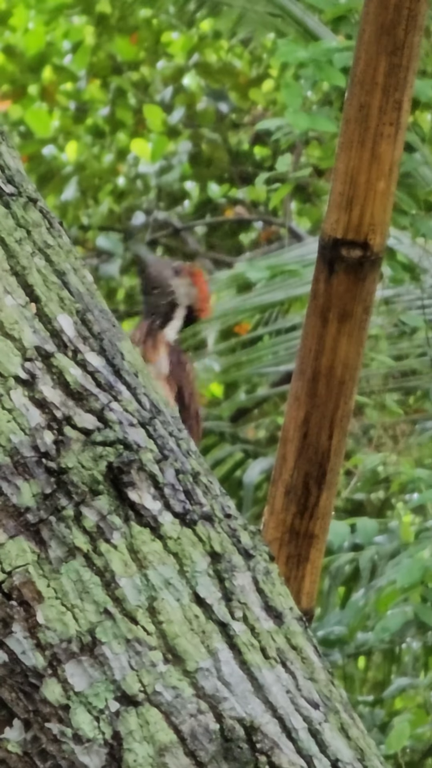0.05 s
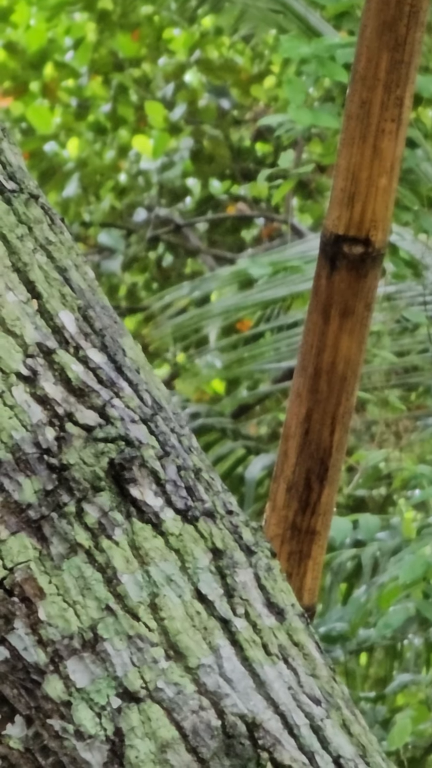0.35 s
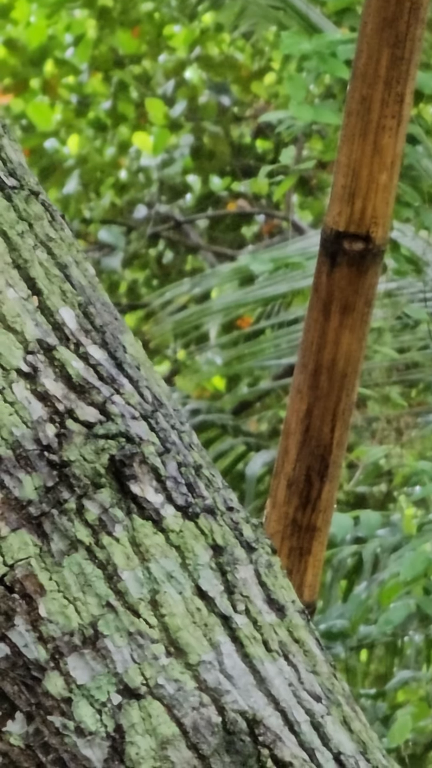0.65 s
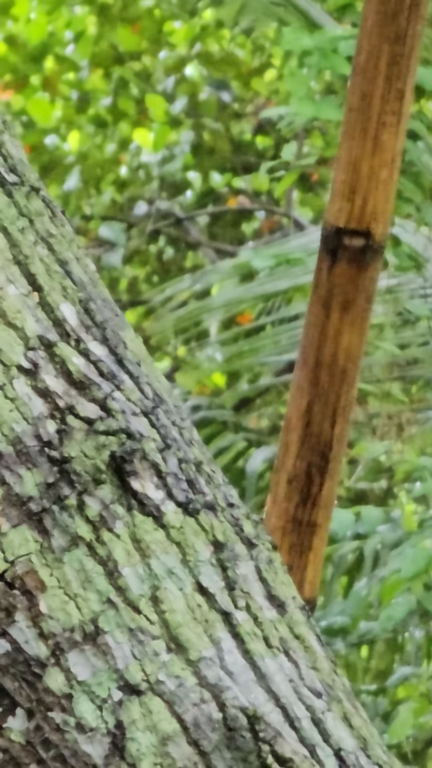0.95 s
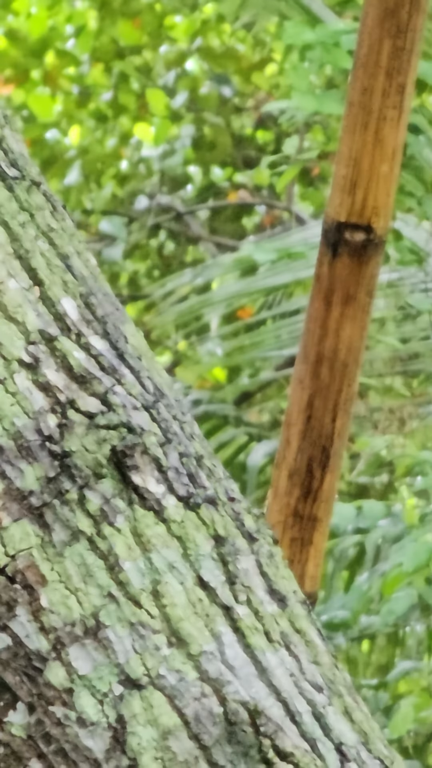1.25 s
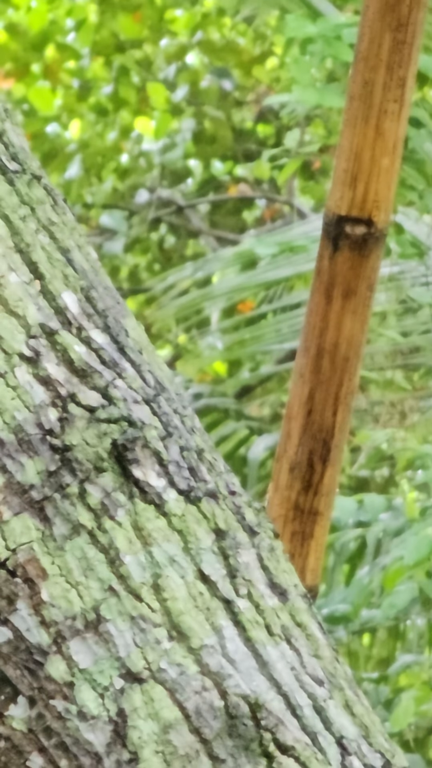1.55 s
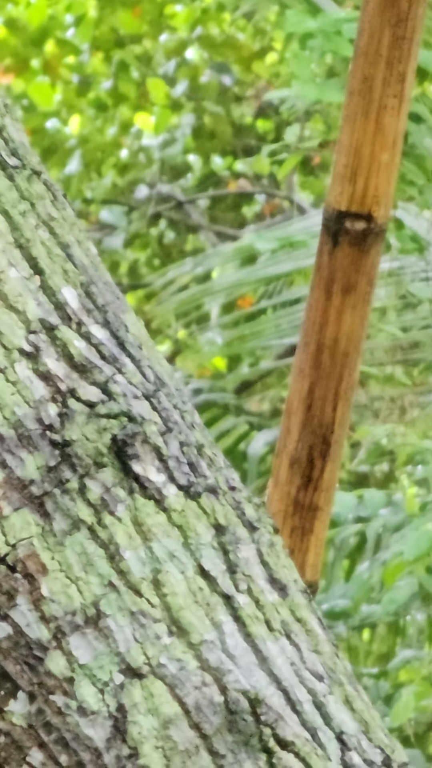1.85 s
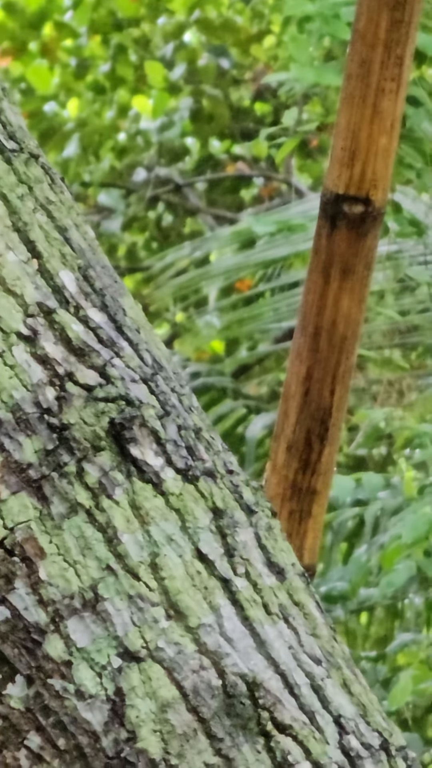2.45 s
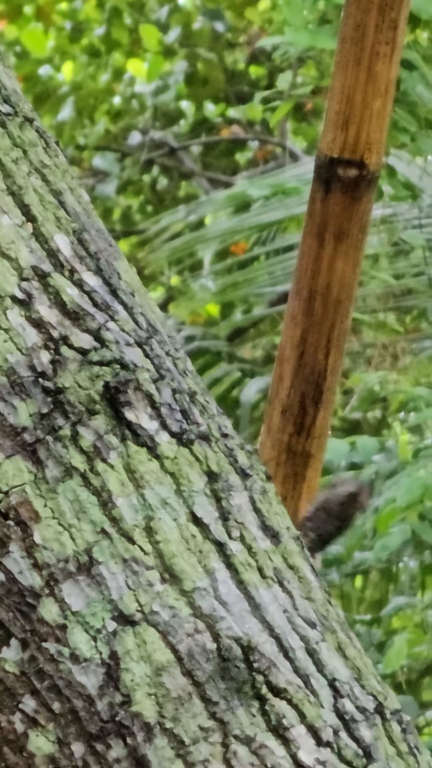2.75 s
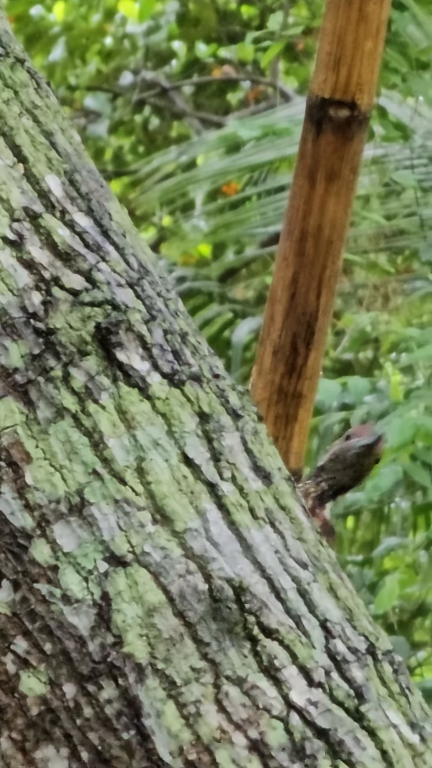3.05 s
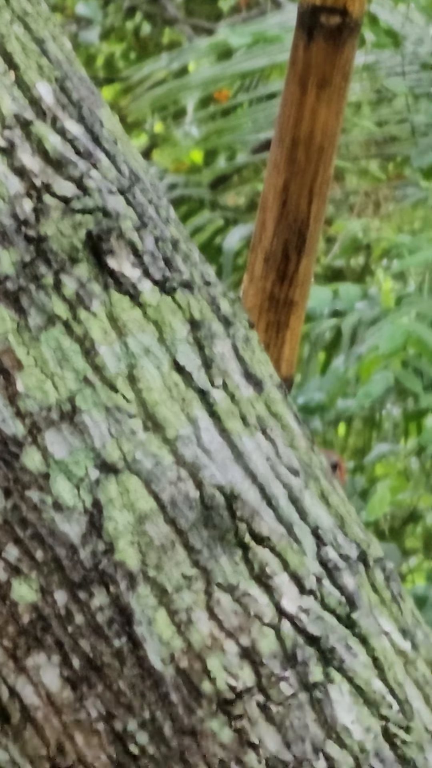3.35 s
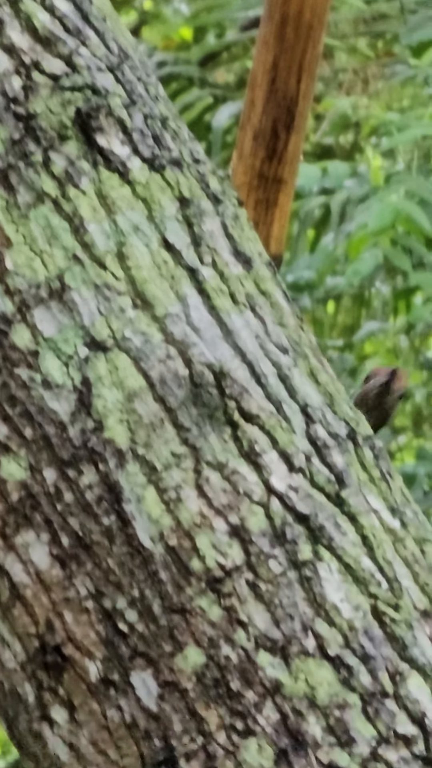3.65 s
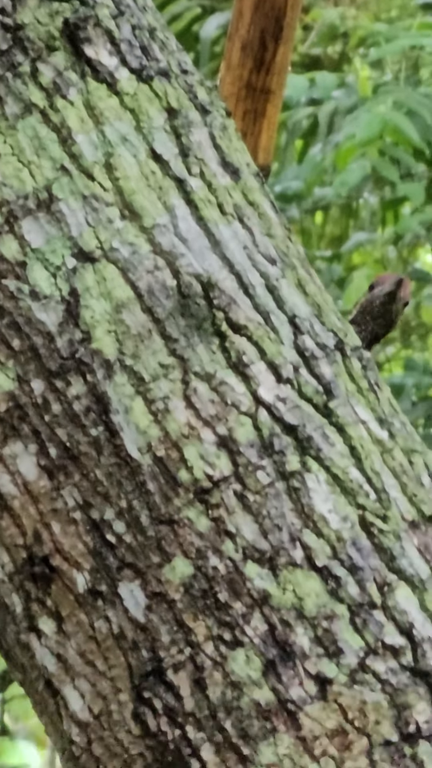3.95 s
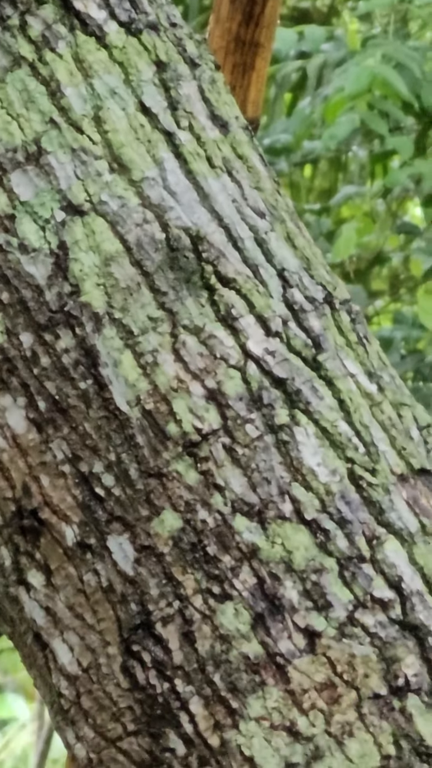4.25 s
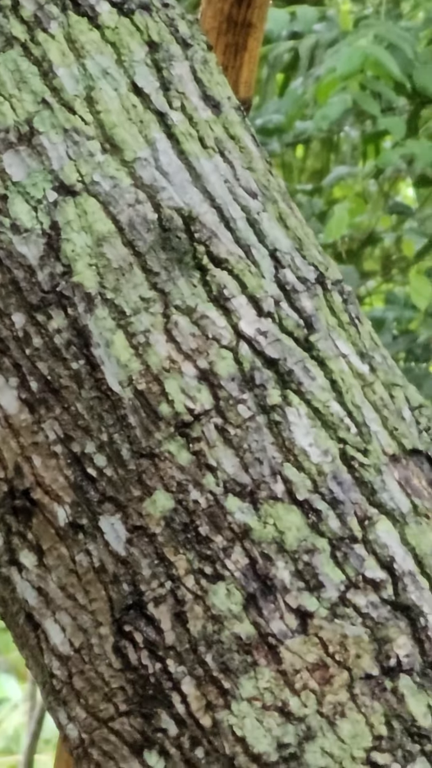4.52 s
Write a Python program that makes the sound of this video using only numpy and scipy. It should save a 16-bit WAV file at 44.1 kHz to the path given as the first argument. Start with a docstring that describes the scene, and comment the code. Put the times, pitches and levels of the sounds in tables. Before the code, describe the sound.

From the start, a close bird slightly to the right repeats a sharp whistle that dips and then sweeps quickly upward. About ten come evenly, roughly three a second, until 3.5 seconds, each with a short outdoor echo. Softer ones follow at about 5.2, 5.5 and 7.2 seconds. At about 7.4 seconds a harsh, rasping screech begins and swells until the end. A steady high insect drone continues throughout, over a faint breeze and a low distant rumble. A small far bird gives five faint runs of six high chirps, about every second and a half. Other distant birds whistle, caw and coo quietly, with caws near 1 to 1.8 seconds and again after 6.5. A few soft puffs of air pass, mostly between 5 and 6 seconds, and twigs tick lightly near 3.7 and 7.4 seconds.

```python
"""A close bird repeats a dipping, upswept whistle among tree trunks, then starts a harsh screech.
The whistle is a frequency-modulated pure tone that interferes with its own echoes; the screech is a
pulsed, noisy source shaped by throat and beak resonances. A small caller chirps in runs, and far birds
whistle, caw and coo, scattered by foliage. Soft puffs of air, one brief far call and ticking twigs are
bursts of noise; behind them lie an insect drone, faint open air and a low rumble."""
import sys
import numpy as np
from scipy import signal
from scipy.fft import rfft, irfft, next_fast_len
from scipy.io import wavfile
from scipy.ndimage import uniform_filter1d, minimum_filter1d, map_coordinates

SR = 44100
rng = np.random.default_rng(int(sys.argv[2]) if len(sys.argv) > 2 else 0)


def waveform_to_disk(signal):
    """Save audio, clipped to [-1, 1], as 16-bit WAV at the path in sys.argv[1]."""
    frames = np.transpose(np.atleast_2d(signal))
    scaled = np.clip(frames, -1, 1) * 32767
    samples = np.round(scaled).astype(np.int16)
    wavfile.write(sys.argv[1], SR, samples)


N = 336042


def whistles(dip_hz=1906.4, full_voice_hz=3146, dip_db=-22, sag_db_per_s=54, release_db_per_s=1301,
             attack_s=0.0053, release_s=0.0036, direct_db=-3.5, wet_db=-7.5, hiss_db=-45):
    """Frequency modulation: one pure tone flicks, dips, then sweeps up, louder as it climbs."""
    # whistles: start t/s, time to the top t/s, top f/Hz, level/dB, extra level at the top/dB
    notes = [(-.22, .194, 4780, -20, -1.5), (.118, 0.15, 4630, -13.5, -15), (.473, 0.14, 4533, -12.5, -1),
             (.814, 0.14, 4564, -11, -1), (1.125, 0.15, 4636, -9.5, -1.5), (1.473, 0.15, 4780, -11, -1.5),
             (1.818, 0.14, 4740, -10, 0.5), (2.163, 0.15, 4710, -10.5, 1), (2.52, .146, 4830, -10.5, 0),
             (2.887, 0.15, 4685, -11, 1.5), (3.296, 0.14, 4655, -13, -1.5), (5.162, 0.15, 4445, -16, -6.5),
             (5.517, 0.16, 4640, -17.5, -6.5), (7.168, 0.15, 4470, -20, -2.5)]
    out, t = np.zeros((2, N)), np.arange(SR // 4) / SR
    flick = np.exp(-((t - 0.0084) / 0.01099) ** 2)
    for s, length, top_hz, db, top_db in notes:
        climb = np.clip((t / length - .45) / .55, 0, 1)  # the last 55 % of the note
        rise = .85 * climb ** 1.22 + .15 * climb ** 7.8  # gathers speed, ends in a quick snap
        octaves = 0.29 * flick + np.log2(top_hz / dip_hz) * rise
        hz = dip_hz * 2 ** octaves
        height = np.clip(2 * hz / top_hz - 1, 0, 1)  # effort changes only the top of the sweep
        softness = np.clip(1 - octaves / np.log2(full_voice_hz / dip_hz), 0, 1) ** 1.39
        soft_db = (dip_db - sag_db_per_s * t) * softness  # the low note fades while held
        release_db = release_db_per_s * np.maximum(t - length + release_s, 0)
        swell = amp(db + soft_db - 6 * flick + top_db * height - release_db)
        swell *= np.minimum(t / attack_s, 1)
        tone = swell * sine(hz)
        hiss = amp(hiss_db) * swell * height * rng.standard_normal(len(t))
        add(out, s, sides(lean_db=-7) * amp(direct_db) * trunks(tone))
        add(out, s, sides(lean_db=-6) * foliage(amp(wet_db) * tone + hiss))
    return out


def screech(pitch_hz=430, rise_per_s=1.1, noise_share=0.89, beak_db=7, beak_width_hz=450):
    """Source and filter: a rising, rasping buzz excites a resonance that climbs as the beak opens."""
    # course of the screech: t/s, level/dB, beak resonance f/Hz
    course = [(7.44, -55, 2000), (7.455, -38.5, 1890), (7.5, -31.5, 2130), (7.53, -31.5, 3000),
              (7.6, -26.5, 3260), (7.62, -22.5, 3280)]
    # throat response: f/Hz, level/dB
    throat = [(150, -55), (320, -13), (418, -31), (479, -10), (599, -30), (935, -7), (1070, -15),
              (3160, -1), (4370, -8), (6480, -16), (8970, -28.5), (11400, -27.5), (15000, -41)]
    t = clock()
    s, db, beak_hz = np.transpose(course)
    cycles = np.cumsum(pitch_hz * (1 + rise_per_s * np.maximum(t - s[0], 0) + 0.015 * wobble(300))) / SR
    pulses = np.diff(np.floor(cycles), prepend=0)
    rasp = rng.standard_normal((2, N)) * (1 + 0.34 * np.cos(2 * np.pi * cycles))
    source = np.sqrt(1 - noise_share) * unit(pulses - pulses.mean()) + np.sqrt(noise_share) * unit(rasp)
    hz, frames, spectra = signal.stft(source, SR, nperseg=512)
    beak = beak_db * np.exp(-((hz[:, None] - np.interp(frames, s, beak_hz)) / beak_width_hz) ** 2)
    voice = signal.istft(spectra * amp(along(throat, hz)[:, None] + beak), SR, nperseg=512)[1][:, :N]
    return sides(lean_db=-5.5) * amp(np.interp(t, s, db, left=-120)) * unit(voice)


def chirper(pitch_hz=3990, arch_hz=270, rasp_hz=110, length_s=0.064, direct_db=-7.5, wet_db=1.5):
    """Random frequency modulation roughens a far caller's arched notes, six to a run."""
    # chirp runs: first chirp t/s, last chirp t/s, level/dB
    runs = [(0.519, 1.077, -51), (1.939, 2.501, -48.5), (3.385, 3.942, -50.5), (4.792, 5.33, -50),
            (6.163, 6.696, -49.5)]
    out, rasp = np.zeros((1, N)), wobble(500)
    u = np.linspace(-1, 1, round(length_s * SR))
    for first, last, db in runs:
        for s in np.linspace(first, last, 6):
            jitter = rasp[rng.integers(N // 2):][:len(u)]
            note = unit(sine(pitch_hz - arch_hz * u ** 2 + rasp_hz * jitter) * (1 - u ** 2) ** .5)
            add(out, s - length_s * 0.78, amp(db) * note[None])
    return sides(lean_db=-7.5) * (amp(direct_db) * out + amp(wet_db) * foliage(out)[:, :N])


def far_birds(caw_hz=1660, chorus_hz=960, chorus_s=0.29, chorus_db=-67, count=12):
    """Diffuse field: far calls and a faint random chorus arrive only as scattered sound."""
    # clear whistles: start t/s, length t/s, first f/Hz, glide/octaves, level/dB
    clear_notes = [(-.05, 0.38, 1375, -.18, -49.5), (-.05, 0.24, 677, -0.087, -55),
                   (1.38, 0.21, 1193, 0.044, -55), (2.681, .72, 1029, 0.14, -55.5),
                   (4.542, 0.24, 1360, .02, -60), (5.867, 0.072, 905, .35, -54),
                   (6.101, 0.085, 738, 0.117, -53), (6.299, .38, 2895, -0.074, -57.5),
                   (6.957, .22, 1062, 0.45, -51), (7.092, 0.1, 885, 0.1, -48)]
    # hoarse caws: start t/s, length t/s, glide/octaves, level/dB
    caws = [(0.889, 0.23, -0.23, -53), (1.463, .368, -0.091, -48), (6.49, 0.35, -0.145, -50.5),
            (7.076, 0.36, 0.3, -50.5)]
    # low coos: start t/s, length t/s, first f/Hz, level/dB
    coos = [(.693, .22, 220, -50), (2.795, 0.079, 232.3, -44), (2.956, 0.077, 319, -57.5)]
    # thin chips of small birds: start t/s, length t/s, first f/Hz, glide/octaves, level/dB
    chips = [(4.19, 0.038, 3200, -0.64, -52), (4.228, 0.063, 4430, 0.06, -53.5),
             (4.494, .113, 3295, .2, -55.5), (6.211, .106, 3370, -.33, -53.5),
             (7.035, 0.042, 2770, -0.48, -49.5)]
    out = np.zeros((1, N))
    for s, length, hz, glide, db in clear_notes:
        add(out, s, amp(db) * far_call(length, hz, glide, rough=0.0196))
    for s, length, glide, db in caws:
        add(out, s, amp(db) * far_call(length, caw_hz * 2 ** (-glide / 2), glide, rough=0.063))
    for s, length, hz, db in coos:
        add(out, s, amp(db) * far_call(length, hz, glide=-.1, rough=0.077))
    for s, length, hz, glide, db in chips:
        add(out, s, amp(db) * far_call(length, hz, glide, rough=0.0066))
    for k, (late, pitch, glide, size) in enumerate(rng.uniform(-1.2, 1, (count, 4))):
        hz = chorus_hz * 2 ** (0.75 * pitch)
        call = far_call(chorus_s * 2 ** (size / 2), hz, 0.065 * glide, rough=0.027)
        add(out, (k + late / 2) / count * N / SR, amp(chorus_db) * call)
    return sides(lean_db=-5) * foliage(out)[:, :N]


def far_call(length, first_hz, glide, rough, flutter_db=2, flutter_per_s=22, shake_per_s=260):
    """Jitter and shimmer: a gliding call of rms 1 shakes in pitch and flutters in level."""
    u = np.linspace(0, 1, max(round(length * SR), 64))
    knots = rng.standard_normal((2, SR // 32))
    shake = map_coordinates(knots[0], [u * length * shake_per_s])
    flutter = map_coordinates(knots[1], [u * length * flutter_per_s])
    hz = first_hz * 2 ** (glide * u) * (1 + rough * shake)
    arch = np.sqrt(np.abs(np.sin(np.pi * u)))
    return unit(sine(hz) * arch * amp(flutter_db * flutter))[None]


def puffs(sharpness=1.18, hiss_db=-35):
    """Band-pass noise: soft puffs of air and one brief far call, each with a trace of hiss."""
    # soft puffs of air and, last, one brief far call: middle t/s, length t/s, centre f/Hz, level/dB
    bursts = [(0.322, 0.068, 348, -46.5), (0.787, 0.028, 750, -43), (2.288, 0.053, 1030, -47),
              (2.512, 0.23, 1110, -47.5), (5.017, .037, 1150, -49), (5.093, .028, 1220, -47.5),
              (5.341, 0.024, 1240, -46.5), (5.741, 0.073, 1060, -46.5), (5.965, 0.07, 1120, -44.5),
              (6.155, 0.029, 776, -48.5)]
    out, t = np.zeros((2, N)), np.arange(SR // 2) / SR
    f = np.fft.rfftfreq(len(t), 1 / SR) + 1
    for s, length, hz, db in bursts:
        colour = 1 / (1 + (sharpness * (f / hz - hz / f)) ** 2) ** 0.92 + amp(hiss_db)
        noise = rng.standard_normal(len(t)) + 1.56 * rng.standard_normal((2, len(t)))
        swell = np.exp(-2 * ((t - t.mean()) / length) ** 2)
        burst = unit(irfft(rfft(noise) * colour, len(t))) * swell
        add(out, s - t.mean(), amp(db) * burst)
    return sides(lean_db=-3) * out


def twigs(t60=0.063, attack_s=0.00072, wet_db=-7):
    """Damped transients: each small snap is broadband noise that decays exponentially."""
    # twig snaps: t/s, level/dB
    ticks = [(2.5046, -53), (3.7222, -40), (7.3522, -45.5)]
    out, t = np.zeros((2, N)), np.arange(SR // 8) / SR
    for s, db in ticks:
        envelope = amp(db + 3.5 - 60 * t / t60) * (1 - np.exp(-t / attack_s))
        snap = envelope * rng.standard_normal((2, len(t)))
        add(out, s - attack_s, snap)
        add(out, s, amp(wet_db) * foliage(snap))
    return out


def insects(level_db=-42):
    """Incoherent addition: countless insects merge into one high band of noise."""
    # drone spectrum: f/Hz, relative density level/dB
    spectrum = [(4700, -32), (5200, -13), (5600, -4.5), (6000, -1), (6300, 2), (6700, -5), (7200, -13.5),
                (7800, -30.5), (8600, -73.5)]
    return amp(level_db + 0.41 * wobble(5.6)) * rush(spectrum)


def open_air(gain_db=5.5):
    """Amplitude modulation: faint broadband air noise swells and ebbs in patches."""
    # course of the breeze: t/s, level/dB
    breeze = [(0.0, -49.5), (0.51, -53.5), (1.04, -52), (2.23, -59), (2.5, -55.5), (5.5, -59),
              (6.03, -55.5), (7.03, -57), (7.62, -51)]
    # air spectrum: f/Hz, relative density level/dB
    spectrum = [(150, -22), (330, -8.5), (560, 4.5), (900, -1), (1400, 0), (2000, -6), (3000, -3.5),
                (4300, -1.5), (5200, -22), (8500, -29.5), (11800, -19.5), (15500, -32.5)]
    breeze_db = np.interp(clock(), *np.transpose(breeze))
    return amp(gain_db + breeze_db + 0.16 * wobble(7.4)) * patchy(rush(spectrum), depth_db=6)


def rumble(level_db=-40):
    """Low-frequency noise: a distant rumble wavers slightly in level."""
    # rumble spectrum: f/Hz, relative density level/dB
    spectrum = [(13, -22.5), (22, -19), (48, 7), (74, 4), (156, -7), (194, -18.5), (235, -21.5), (330, -30),
                (430, -67.5), (730, -120)]
    return amp(level_db + 0.61 * wobble(5.8)) * rush(spectrum)


def trunks(x, lead_s=0.000092):
    """Comb filtering: the direct sound, earlier on the left, interferes with its first echoes."""
    # reflections from trunks and ground, on the left: delay t/s, level/dB
    left = [(.00096, -6), (.00205, -7), (.0031, -15), (.00447, -10), (.00487, -11), (.00637, -14),
            (.0082, -17), (.00966, -13), (.01054, -16)]
    # reflections on the right: delay t/s, level/dB
    right = [(.00102, -6), (.00254, -9), (.00356, -10), (.00384, -8), (.00438, -9), (.00472, -7),
             (.00537, -10), (.00593, -9), (.01331, -15)]
    f = np.fft.rfftfreq(x.size, 1 / SR)
    delayed = lambda s: np.exp(-2j * np.pi * f * s)
    paths = np.array([1 + sum(amp(db) * delayed(s) for s, db in side) for side in (left, right)])
    paths /= np.sqrt(np.mean(np.abs(paths) ** 2, axis=1, keepdims=True))
    return irfft(rfft(x) * paths * [delayed(-lead_s / 2), delayed(lead_s / 2)], x.size)


def foliage(x, early_db=9, early_t60=0.13, build_s=.004):
    """Scattering: near leaves return a quick dense echo, the far garden a longer one."""
    # garden reverberation: f/Hz, time to decay by 60 dB t/s
    garden = [(300, 0.89), (2000, 0.65), (3500, 0.8), (5000, 0.9), (12000, 0.08)]
    hz, t, spectra = signal.stft(rng.standard_normal((2, SR)), SR, nperseg=256)
    fade = amp(-60 * t / along(garden, hz)[:, None]) + amp(early_db - 60 * t / early_t60)
    build = 1 - np.exp(-t / build_s)
    tail = signal.istft(spectra * fade * build, SR, nperseg=256)[1]
    return signal.fftconvolve(np.atleast_2d(x), tail / np.linalg.norm(tail[0]), axes=1)


def rush(spectrum):
    """Partial coherence: coloured stereo noise of rms 1, alike in the bass, unrelated in the treble."""
    # likeness of left and right: f/Hz, correlation
    alike = [(60, 0.87), (130, 0.95), (290, 0.59), (640, 0.71), (1410, 0.088), (3100, 0.2), (6800, 0)]
    # balance: f/Hz, left minus right level/dB
    lean = [(60, 0.3), (200, -1.6), (700, -4.5), (1300, -3), (2400, -5), (4400, -7.5), (6300, 1.5),
            (8100, 13.5), (15000, -7)]

    def mid_side(hz):
        turn = np.arccos(np.clip(along(alike, hz), -1, 1)) / 2
        return amp(along(spectrum, hz)) * [np.cos(turn), np.sin(turn)]

    mid, side = filtered(rng.standard_normal((2, N)), mid_side)
    return unit(filtered(np.array([mid + side, mid - side]), lambda hz: sides(along(lean, hz))))


def patchy(x, depth_db):
    """Random modulation: slow patches of gain over time and frequency."""
    spectra = signal.stft(x, nperseg=1024)[2]
    field = uniform_filter1d(rng.standard_normal(spectra.shape[1:]), size=4, axis=0)
    field = uniform_filter1d(field, size=14, axis=1)
    return unit(signal.istft(spectra * amp(depth_db * unit(field)), nperseg=1024)[1][:, :N])


def amp(db):
    """Decibels to gain."""
    return 10 ** (np.asarray(db) / 20)


def unit(x):
    """Normalisation to rms 1."""
    return x / np.sqrt(np.mean(x ** 2) + 1e-20)


def along(points, hz):
    """Interpolation of (f/Hz, value) points on a log axis."""
    f, v = np.transpose(points)
    return np.interp(np.log(hz + 1), np.log(f + 1), v)


def clock():
    """The time of each sample, t/s."""
    return np.arange(N) / SR


def sine(hz):
    """A tone whose phase is the integral of its frequency."""
    return np.sin(2 * np.pi * np.cumsum(hz) / SR)


def wobble(rate):
    """Band-limited noise: a smooth curve through rate knots a second."""
    knots = rng.standard_normal(int(N * rate / SR) + 4)
    fine = signal.resample_poly(knots, 8, 1)
    return np.interp(clock() * rate, np.linspace(0, len(knots), len(fine)), fine)


def filtered(x, response):
    """Linear filtering: the spectrum of x times a frequency response."""
    m = next_fast_len(N + SR // 4)
    return irfft(rfft(x, m) * response(np.fft.rfftfreq(m, 1 / SR)), m)[..., :N]


def sides(lean_db):
    """Left and right gains for a level difference."""
    return amp(np.array([[.5], [-.5]]) * lean_db)


def add(out, s, x):
    """Superposition of x onto out at time s."""
    i = round(s * SR)
    x, i = x[:, max(-i, 0):], max(i, 0)
    out[:, i:i + x.shape[1]] += x[:, :N - i]


def scene():
    """Superposition: the pressures of all sources in the garden add."""
    events = whistles() + screech() + far_birds() + puffs() + twigs() + chirper()
    return events + insects() + open_air() + rumble()


def record(dry, ceiling=.9, top_hz=15800):
    """Peak and band limiting: the gain eases down at peaks over the ceiling; the top treble is cut."""
    needed = np.minimum(1, ceiling / (np.abs(dry).max(axis=0) + 1e-9))
    gain = uniform_filter1d(minimum_filter1d(needed, size=400), size=400)
    return filtered(dry * gain, lambda hz: hz < top_hz)


dry = scene()
out = record(dry)
waveform_to_disk(out)
```